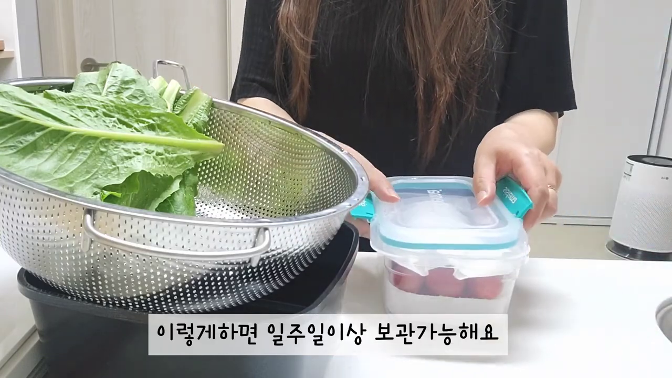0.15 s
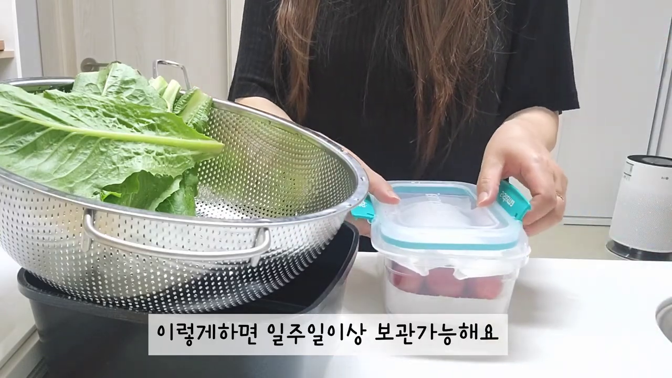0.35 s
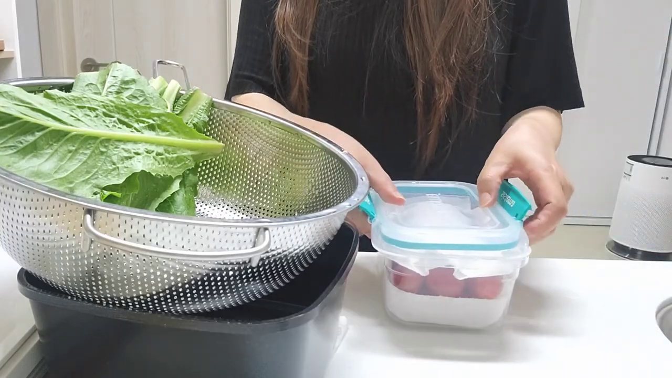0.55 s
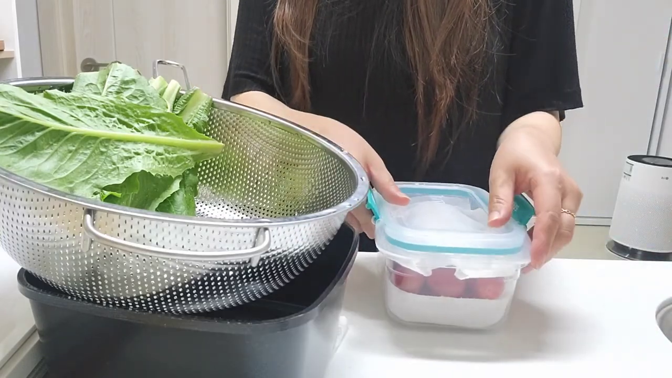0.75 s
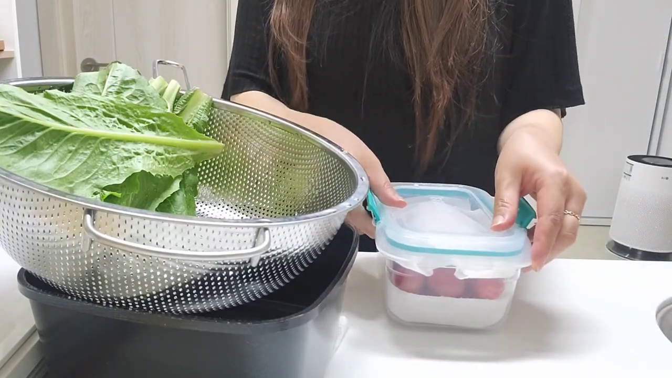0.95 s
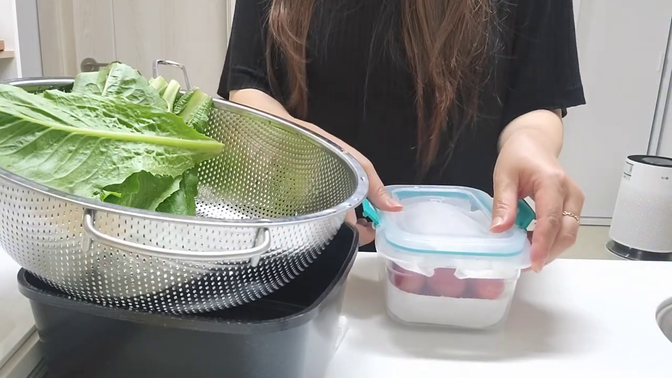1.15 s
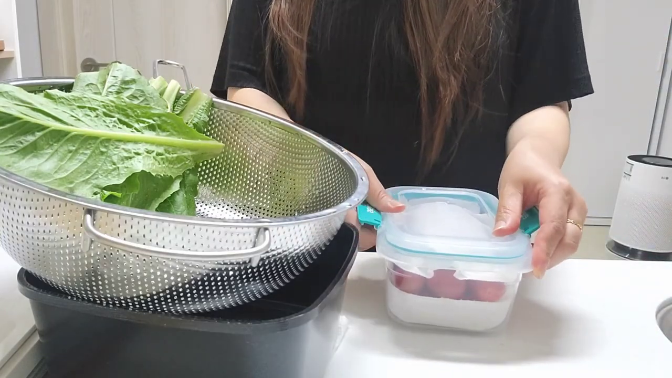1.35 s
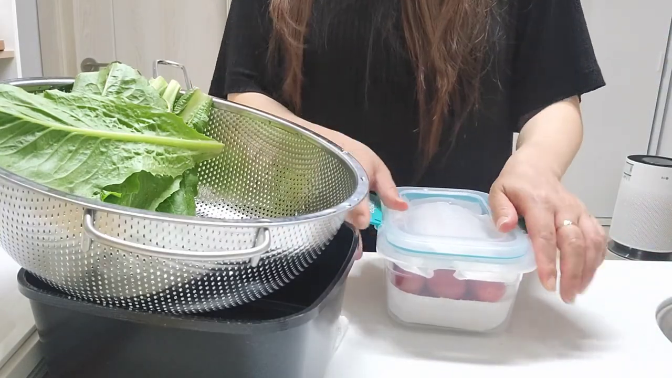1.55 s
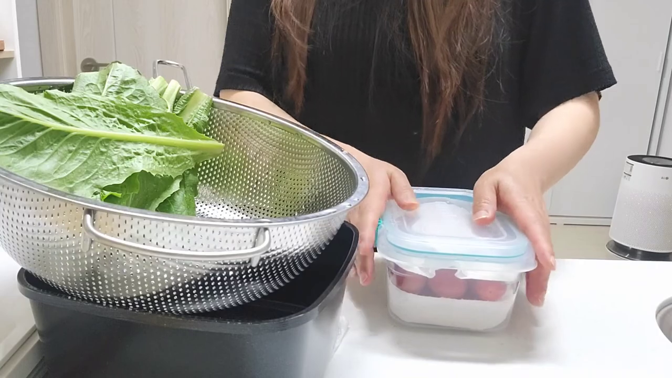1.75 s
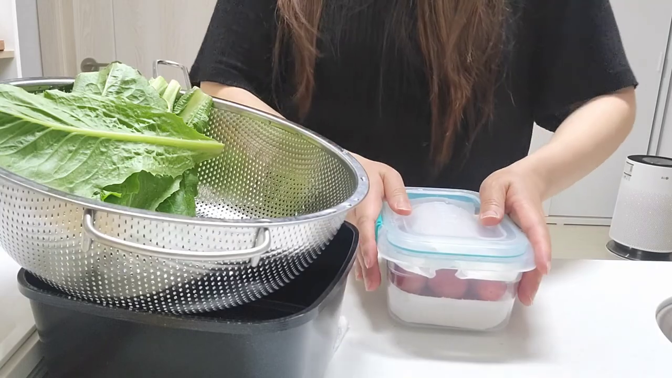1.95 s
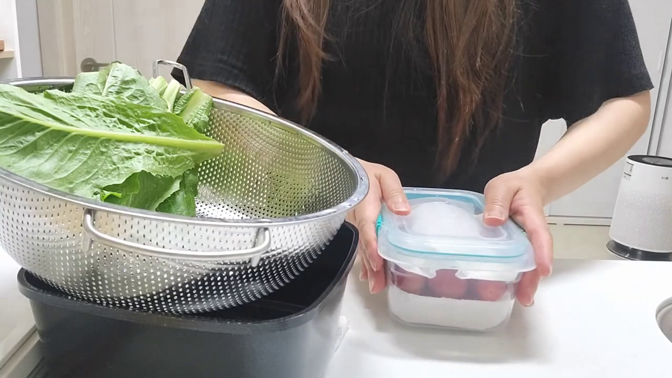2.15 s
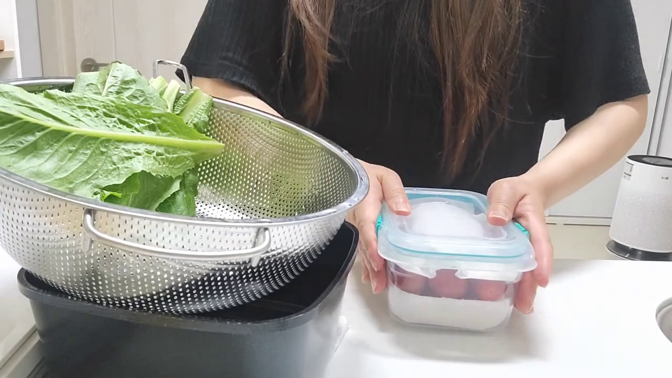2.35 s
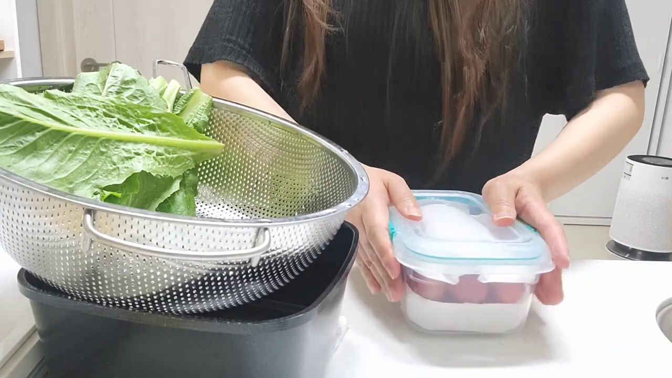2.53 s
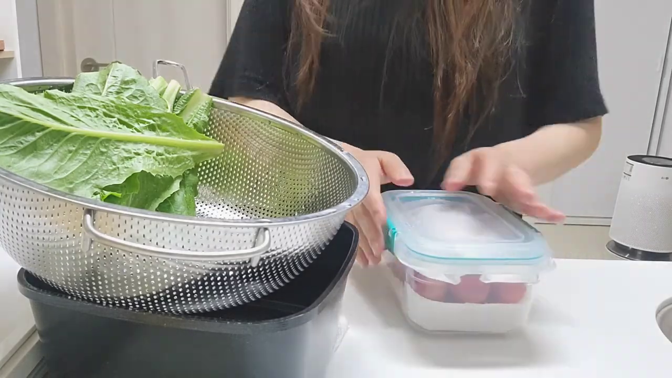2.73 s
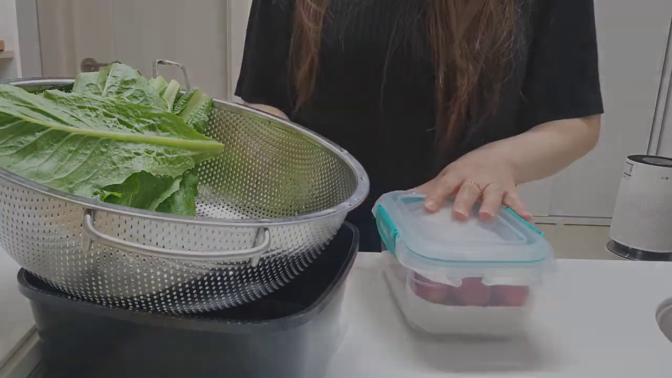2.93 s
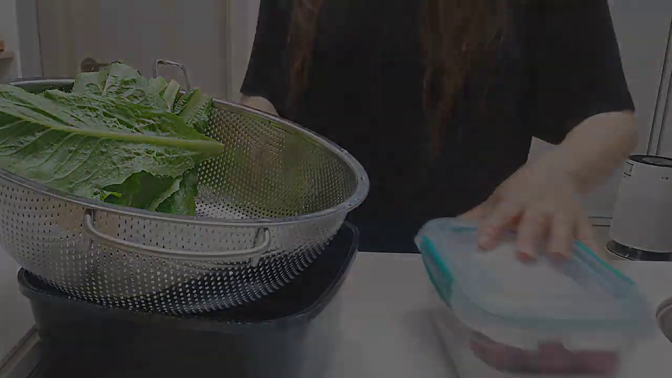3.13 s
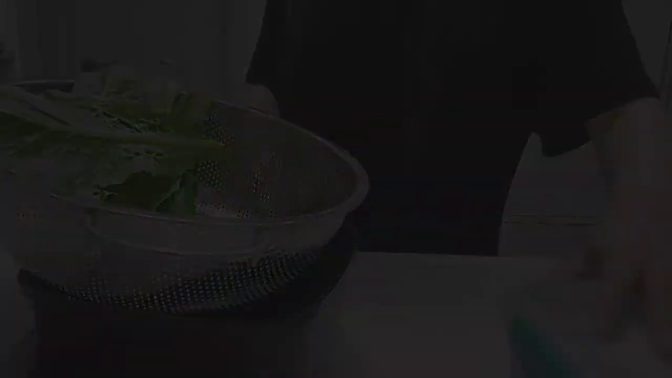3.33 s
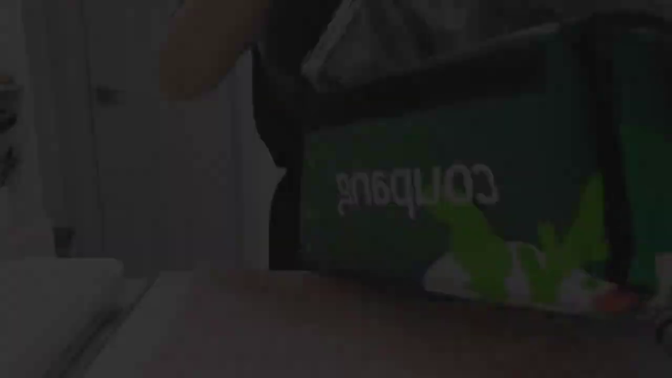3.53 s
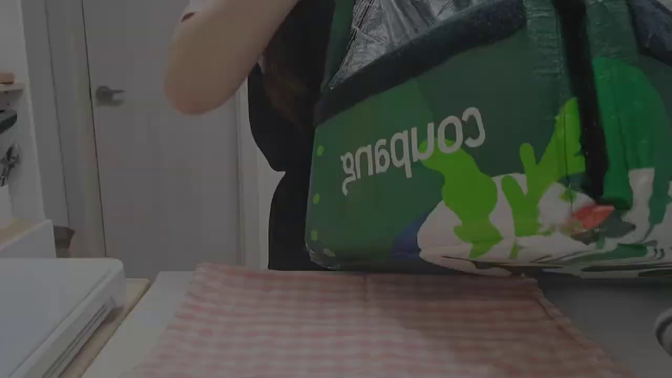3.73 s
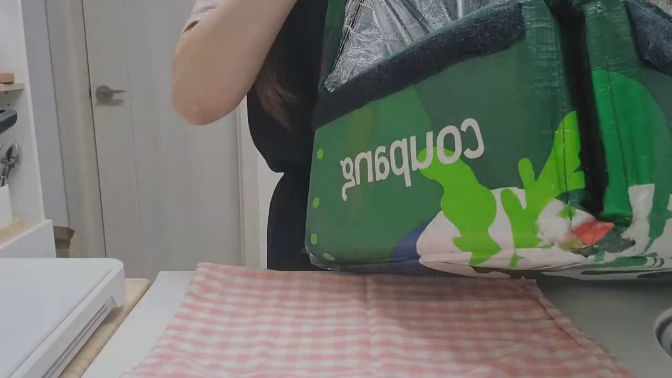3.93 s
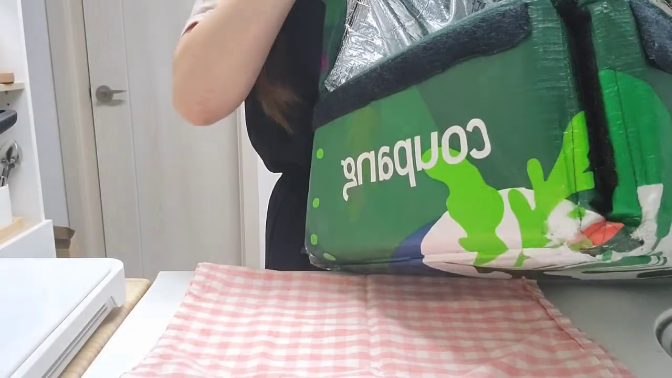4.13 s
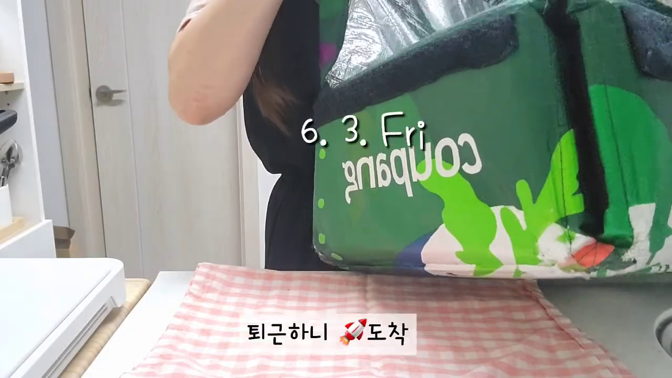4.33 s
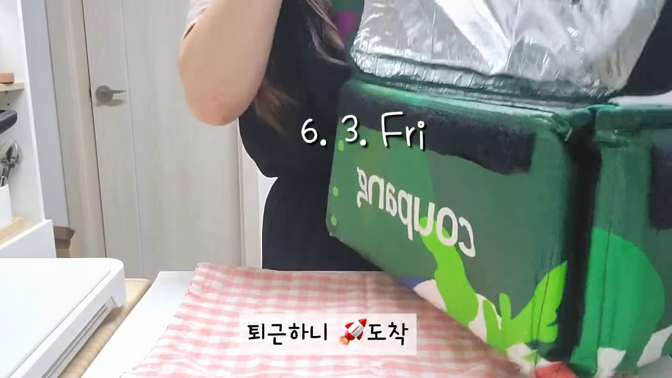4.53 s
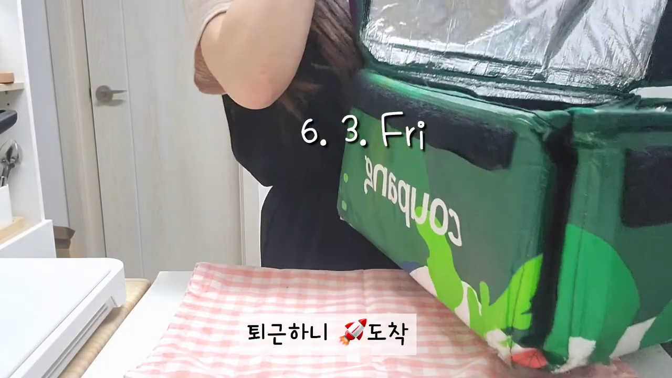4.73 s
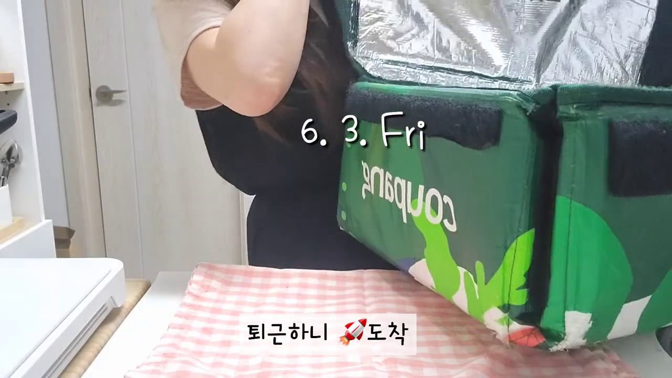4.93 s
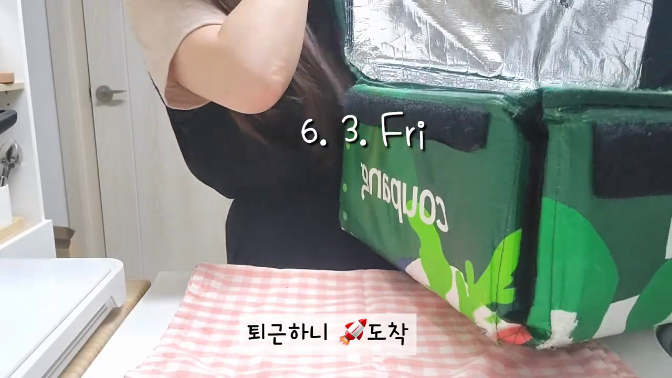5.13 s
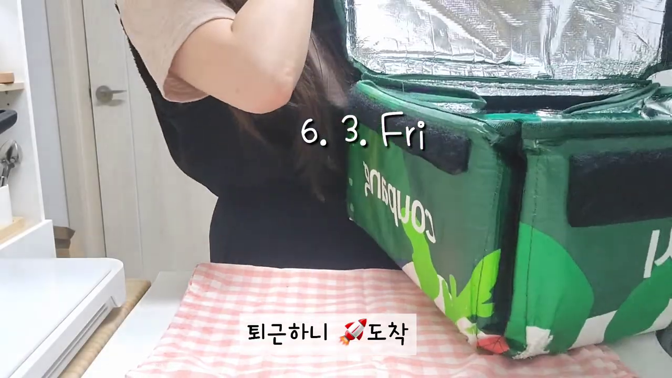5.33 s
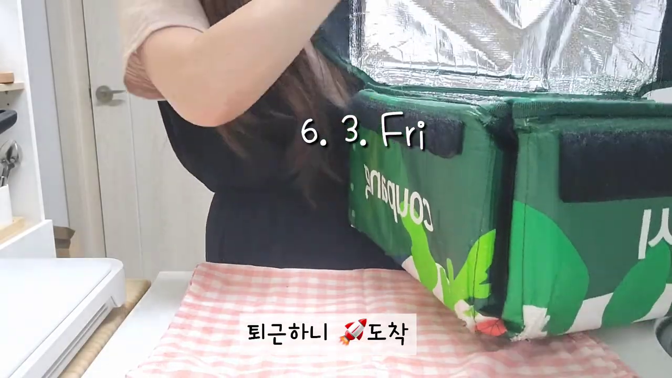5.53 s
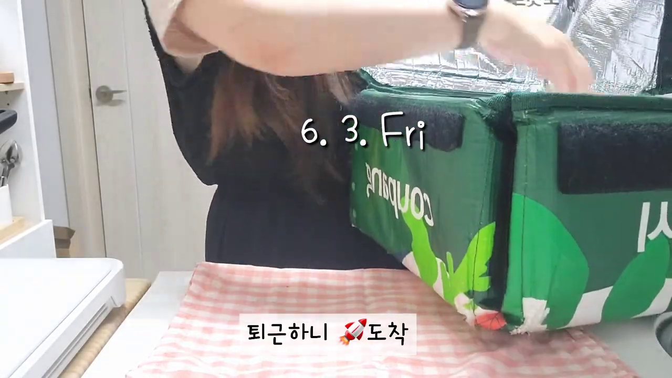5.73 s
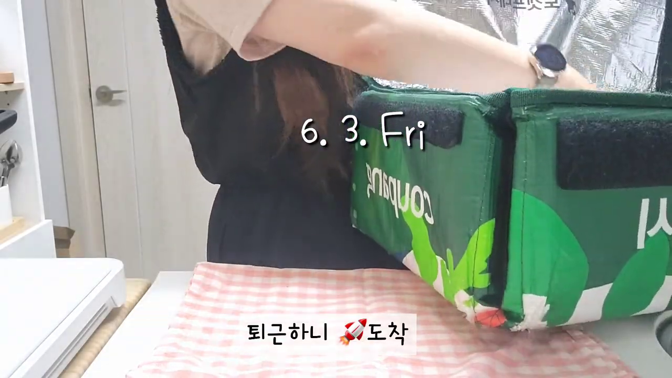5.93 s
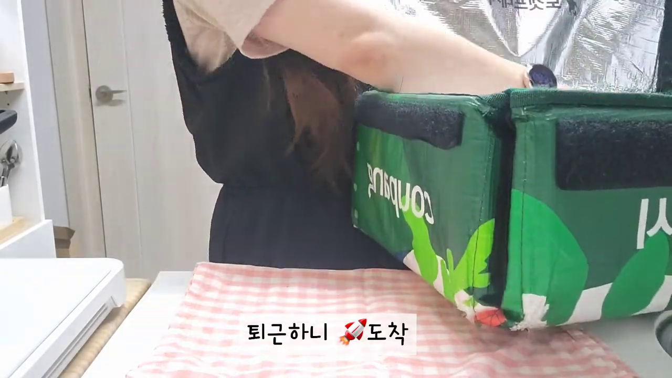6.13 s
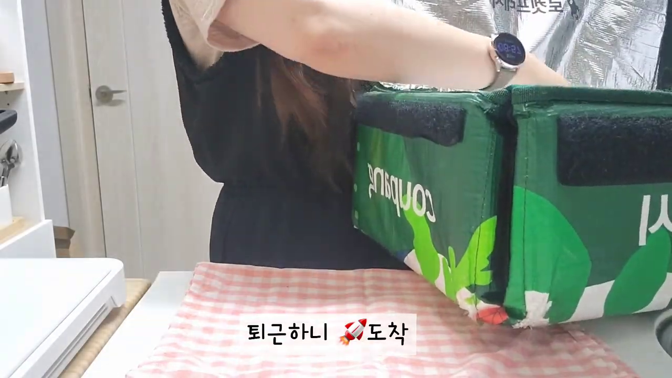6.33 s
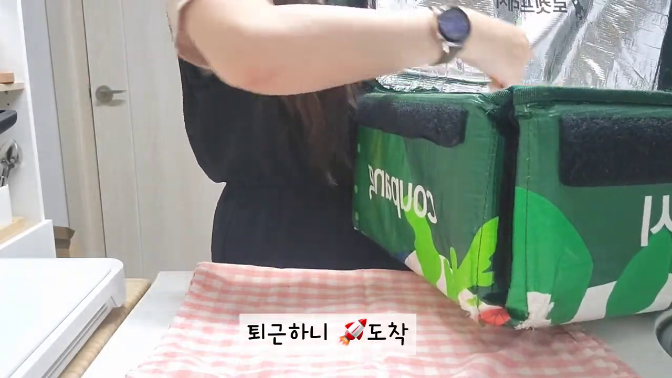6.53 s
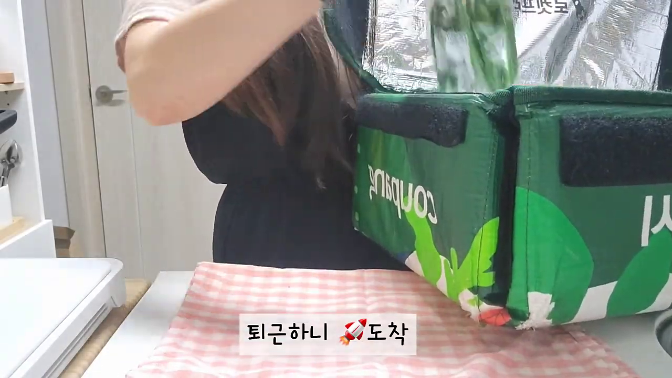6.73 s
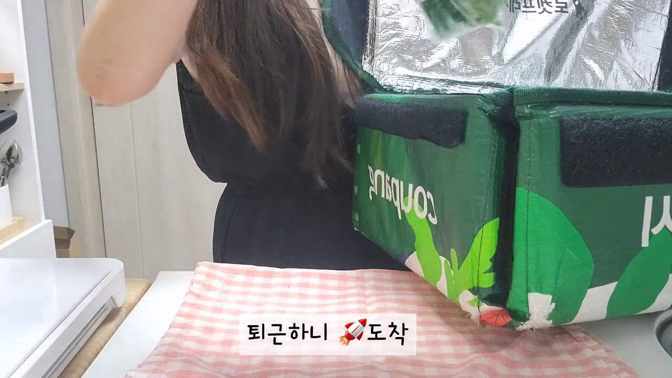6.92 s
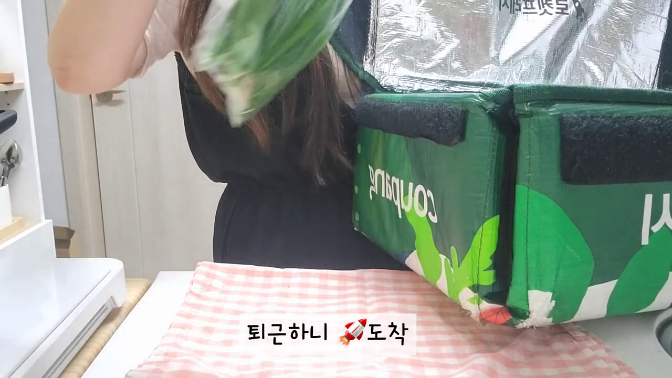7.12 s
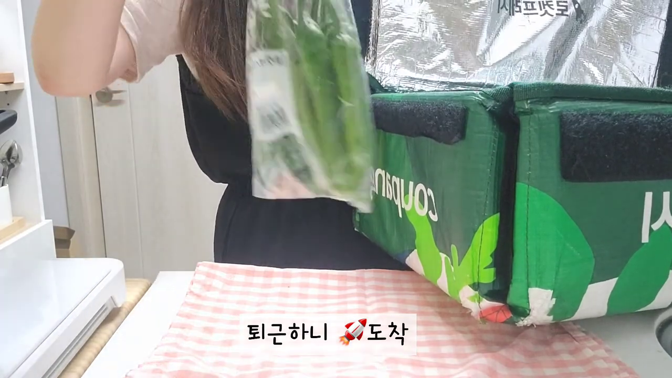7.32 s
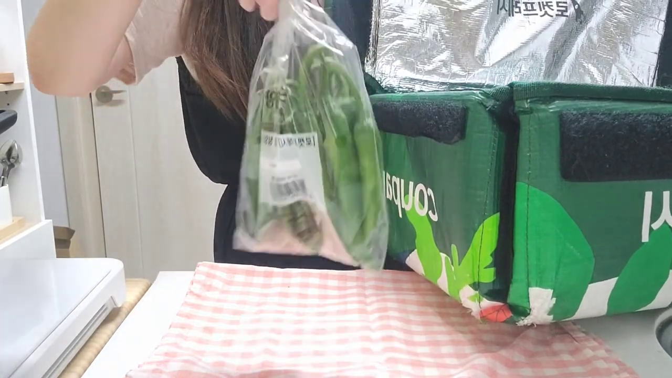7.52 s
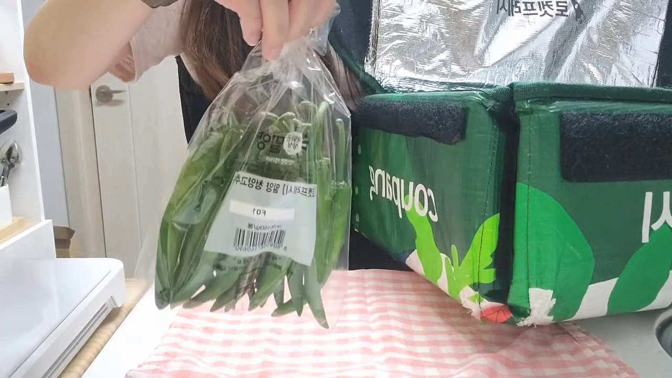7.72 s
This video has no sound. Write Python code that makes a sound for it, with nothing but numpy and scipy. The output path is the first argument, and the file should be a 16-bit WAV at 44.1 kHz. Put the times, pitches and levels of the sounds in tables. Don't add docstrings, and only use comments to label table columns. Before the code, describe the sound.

Plastic food box latches snap shut and the box slides off, then a padded foil-lined bag thumps down and thin film crinkles.

```python
import sys
import numpy as np
from scipy import signal
from scipy.fft import rfft, irfft, next_fast_len
from scipy.io import wavfile
from scipy.ndimage import uniform_filter1d

SR = 44100
rng = np.random.default_rng(int(sys.argv[2]) if len(sys.argv) > 2 else 0)


def dump(signal):
    limited = np.clip(np.atleast_2d(signal).T, -1, 1)
    pcm = np.round(limited * 32767).astype(np.int16)
    wavfile.write(sys.argv[1], SR, pcm)


def gain_from_db(level_db):
    decades = np.asarray(level_db, float) / 20
    return 10 ** decades


N = 347067
SCENE_CHANGE_S = 3.538
FILM_LEAVES_S = 6.88

# f/Hz, level/dB per Hz
AIR_BEFORE = [(44, -29.5), (75, 0), (96, -4.5), (184, -7), (462, -19), (528, -17), (707, -18.5),
              (1010, -33.5), (1390, -27.5), (2080, -36.5), (16000, -56.5)]
AIR_AFTER = [(12, -47), (20, -27), (117, -2.5), (174, -17.5), (237, 0.5), (479, -8.5), (709, 0.5),
             (994, -13), (1110, -9.5), (2970, -17.5), (9670, -44), (14300, -33.5), (16500, -32)]
# f/Hz, width/Hz, level/dB
FRIDGE_LINES = [(111.1, 3, -64.5), (225.7, 17, -69.5)]
# t/s, level/dB
FINGER_RUBS = [
    [(0.0, -71), (0.236, -69), (0.28, -55)],
    [(0.66, -78), (0.78, -74)],
    [(1.34, -69), (1.42, -65.5), (1.55, -90)],
    [(1.58, -74), (1.682, -67), (1.82, -62.5), (1.9, -80)],
]
# f/Hz, level/dB per Hz
SKIN_COLOUR = [(300, -36), (650, -14), (950, -15), (1300, -8.5), (2200, -25.5), (4200, -22), (14000, -40.5)]
# t/s, level/dB
BOX_NUDGES = [
    [(1.88, -72), (2.04, -59.5), (2.14, -63.5)],
    [(2.5, -75), (2.54, -58.5), (2.9, -83)],
]
# rim pitch/factor, plain scuff/dB re rims
NUDGE_GRIPS = [
    (1, -5),
    (1.075, 2.5),
]
# f/Hz, width/Hz, level/dB
RIM_MODES = [(1340, 150, -6), (2480, 180, -8), (3200, 230, -3), (3600, 260, 0), (4900, 400, -6),
             (6060, 200, -8)]
# t/s, hiss level/dB, scrape/dB re hiss
LONG_PUSH = [(2.98, -97.5, 21), (3.05, -52.5, -6), (3.12, -56.5, -2.5), (3.462, -43, -9.5), (3.538, -62, 4)]
# f/Hz, level/dB
PUSH_COLOUR = [(1500, -7), (3000, -2.5), (6000, 11), (9000, 8.5), (15100, 6), (16100, -9.5), (16500, -38)]
# t/s, level/dB
LID_GRIP = [(0, -58.5), (.1, -60.5), (.27, -58.5), (.29, -50)]
# f/Hz, width/Hz, level/dB
GRIP_MODES = [(656, 110, 3), (1380, 380, -3.5)]
# t/s, peak level/dB, hollow body/dB re peak, bright crack/dB re peak
BOX_TAPS = [(0.0713, -32.5, 1.5, -26), (0.221, -55, 1, -5), (0.272, -42.5, 10, -17), (2.151, -42, 4, -20.5),
            (0.78, -55.5, 16, -21), (0.824, -43.5, 1, -14), (0.835, -50, 15.5, -32), (1.146, -52, -2, -19),
            (1.132, -51, 6.5, -12), (1.31, -61, 8, -17), (1.38, -55, 2, -16), (1.65, -38.5, -0.5, -22),
            (1.722, -36, -8, -17), (1.75, -46, 1, -14), (1.777, -50, 10.5, -3), (1.785, -32, -14, -15),
            (1.843, -39.5, -7, -24), (1.857, -37, -3, -31), (2.761, -54, 1, -11), (2.898, -57, 0.5, -15),
            (2.918, -48.5, -2.5, -14), (3.104, -40.5, 3, -6), (3.292, -30, -11, -9),
            (3.329, -22.5, -10.5, -9), (3.343, -35, -6, -25), (3.409, -41, -4, -20), (0.585, -62.5, 8, -22)]
# f/Hz, width/Hz, level/dB
BOX_MODES = [(328, 11.6, 4), (700, 59, 5), (1270, 11, 11), (1450, 22, 7), (1900, 34, -7.5), (2570, 33, -18),
             (2950, 72, -5), (4130, 100, -11.5)]
# t/s, length/s, f/Hz, level/dB
SQUEAK_EVENTS = [(3.415, 0.085, 5300, -51), (2.71, 0.09, 3640, -74), (3.685, 0.027, 5810, -56),
                 (5.16, 0.05, 4240, -63), (5.87, 0.05, 4120, -68), (3.015, .09, 3980, -62),
                 (3.045, .09, 3280, -62), (3.14, .05, 8300, -64), (3.225, .07, 3400, -60),
                 (3.26, .045, 8800, -57), (3.26, .05, 2000, -59), (3.3, .06, 5400, -57),
                 (3.37, .03, 4500, -55), (3.44, .06, 7900, -59), (1.915, .04, 3620, -70),
                 (1.925, .03, 6050, -72), (.1, .08, 4300, -80), (1.61, .04, 3500, -74)]
# t/s, peak level/dB, hollow body/dB re peak, bright crack/dB re peak
LATCH_SNAPS = [
    (0.283, -13, -3.5, -18),
    (2.1595, -11.5, 1.5, -23.5),
    (2.198, -2.5, -16.5, -17),
    (2.303, -15.5, 4.5, -32),
    (2.3099, 1.5, -12, -13),
]
# f/Hz, width/Hz, level/dB
SHUT_BOX_MODES = [(300, 74, -2), (514.4, 26, -23.5), (713, 40, 5), (1160, 26, 0), (1380, 76, 8.5),
                  (1600, 80, 3), (2000, 53, -6), (2520, 80, -12), (3000, 150, -0.5), (3820, 100, -13),
                  (4300, 260, -21)]
# t/s, peak level/dB, f/Hz
COUNTER_BUMPS = [(0.3, -35.5, 168), (2.156, -24.5, 296), (2.913, -42, 177), (3.83, -43.5, 59),
                 (4.06, -35, 81), (4.256, -34, 300), (4.379, -31, 156), (4.455, -25, 198),
                 (4.487, -30, 190), (4.529, -27, 260), (4.573, -25.5, 300), (4.616, -25.5, 114),
                 (5.601, -46.5, 240), (6.695, -39, 210), (7.077, -55, 306)]
# start t/s, hold/s, cloth level/dB, foil/dB re cloth, wall flex/dB re cloth
BAG_MOVES = [(3.538, 0.043, -40, 2, 3), (3.61, 0.077, -44.5, 3, 5.5), (3.7, 0.27, -63, -1, 11.5),
             (3.8, 0.048, -46, -1.5, -4), (4.05, 0.022, -46, -3, 3), (4.144, 0.0041, -45, 4, 0),
             (4.24, 0.17, -39, 5, -3.5), (4.44, 0.13, -33, 3.5, -1.5), (4.6, 0.091, -36, -6, -3),
             (4.675, 0.0083, -46, -14, -12), (4.8, 0.042, -47.5, -1, 0), (4.88, 0.6, -53, -3, -3),
             (5.458, 0.14, -55.5, 7.5, -30), (5.65, 0.082, -54.5, -6, -30), (5.83, 0.091, -60.5, 3, -30)]
# f/Hz, level/dB per Hz
CLOTH_COLOUR = [(210, 12.5), (350, -3), (885, -19.5), (1210, 2.5), (1340, -4.5), (2570, -9), (7000, -27),
                (9100, -57), (15400, -120)]
# f/Hz, level/dB per Hz
FOIL_COLOUR = [(2060, 11), (3500, 5.5), (15000, -13), (16200, -16), (16500, -59.5)]
# f/Hz, level/dB per Hz
WALL_COLOUR = [(24, -36), (40, 6.5), (112, -0.5), (248, -10.5), (600, -7), (780, -8), (1320, -120)]
# t/s, peak level/dB, centre f/Hz, bright crack/dB re peak
BAG_FOLDS = [(3.5386, -35, 1220, -7), (3.5671, -30.5, 1580, -16.5), (3.544, -44, 1300, -25),
             (3.579, -43, 2700, -25), (3.589, -35, 3000, -25), (3.6, -39, 1380, -34),
             (3.611, -30, 1230, -30), (3.619, -29, 1160, -14), (3.641, -40, 3000, -25),
             (3.654, -33, 3200, -25), (3.672, -28, 1600, -25), (3.684, -42, 3200, -25),
             (3.719, -43, 790, -28), (3.73, -49, 1310, -28), (3.749, -44, 1240, -28),
             (3.792, -50, 690, -30), (3.837, -32, 3330, -25), (3.6595, -21.5, 1600, -30),
             (3.736, -32.5, 1250, -11), (3.766, -31, 5700, -16), (3.8067, -32.5, 3230, -20.5),
             (3.823, -30, 1670, -17), (3.9319, -34, 1380, -38), (4.051, -38.5, 1450, -31),
             (4.0605, -38.5, 940, -27), (4.1185, -35, 1040, -17), (4.1434, -29.5, 1720, -2.5),
             (4.1848, -35.5, 1220, -34), (4.239, -31, 1730, -31), (4.4048, -23, 2650, -25),
             (4.4384, -35, 1450, -14), (4.5243, -31, 1090, -25), (4.255, -24, 1900, -29),
             (4.665, -27, 2200, -28), (4.697, -18.5, 3000, -32), (4.683, -19, 1800, -22),
             (4.687, -22.5, 2950, -31)]
# t/s, peak level/dB, centre f/Hz
SETTLING_FOLDS = [(4.804, -36.5, 1240), (4.8143, -36.5, 1240), (4.826, -32.5, 1600), (4.74, -55, 1700),
                  (4.995, -40, 1520), (5.052, -38, 690), (5.331, -55, 1500), (4.86, -44, 2900),
                  (4.877, -40.5, 2040), (4.929, -43, 1760), (4.9474, -32, 1260), (4.986, -36, 1600),
                  (5.042, -28.5, 1650), (5.0955, -42, 1160), (5.1152, -39, 1770), (5.224, -41.5, 1380),
                  (5.4605, -34.5, 1510), (5.615, -39, 2000), (5.632, -44, 1900), (5.684, -48, 3500),
                  (5.5834, -43, 1810)]
# start t/s, hold/s, crinkle level/dB, lower body/dB re crinkle
FILM_PULLS = [(6.114, 0.0046, -47, 9), (6.158, 0.052, -45, 3.5), (6.235, 0.078, -43, 1.5),
              (6.345, 0.061, -43, 4.5), (6.465, 0.041, -42.5, 0), (6.55, 0.12, -46, 2),
              (6.64, 0.076, -40.5, 0), (6.72, 0.087, -46.5, -1.5), (6.852, 0.071, -41, -2),
              (6.945, 0.062, -43.5, -1), (7.048, 0.035, -35.5, 0), (7.074, 0.012, -42, -2),
              (7.162, 0.027, -35.5, -3), (7.2, 0.2, -44, -3.5), (7.411, 0.011, -45, -0.5),
              (7.466, 0.036, -46.5, 4.5), (7.545, 0.038, -45, 0.5), (7.7, 0.028, -48, 1.5),
              (7.82, 0.041, -55.5, -1)]
# f/Hz, level/dB per Hz
FILM_COLOUR = [(1800, -42), (3500, 0), (9000, -11), (15100, -11), (16200, -11)]
# f/Hz, level/dB per Hz
BUNDLE_COLOUR = [(200, 6.5), (400, -5), (1000, -11.5), (1800, -5.5), (2400, -11), (3100, -3.5), (4000, -22),
                 (6000, -14), (9000, -9)]
# f/Hz, width/Hz, level/dB
POCKET_MODES = [(1800, 300, 0), (3080, 340, -2), (3900, 300, -2)]
# t/s, peak level/dB, centre f/Hz, contact/ms
FILM_CREASES = [(6.1154, -38, 3340, 7.2), (6.201, -41, 1470, 5.6), (6.248, -37, 3000, 5.3),
                (6.282, -34, 1980, 6), (6.3473, -42, 1740, 4.3), (6.385, -30, 3300, 8.8),
                (6.404, -44, 3800, 4.3), (6.4475, -35, 3070, 4.5), (6.4655, -36.5, 1660, 7.4),
                (6.488, -36, 4000, 4), (6.5455, -37, 2070, 7), (6.582, -37.5, 1800, 3.8),
                (6.607, -40, 1770, 5.5), (6.662, -30, 3000, 10), (6.265, -30, 2910, 8.4),
                (6.361, -33.5, 1840, 4.1), (6.654, -28, 3000, 4), (6.6918, -26.5, 1900, 27),
                (6.7069, -22, 3130, 9.7), (6.8312, -40.5, 1690, 4), (6.853, -39, 1680, 6),
                (6.8726, -31, 3000, 4.7), (6.926, -35.5, 1450, 4.3), (6.954, -36, 1800, 4.5),
                (6.9056, -27, 2800, 3.1), (6.99, -32.5, 1880, 3.6), (7.0542, -37, 1620, 3.2),
                (7.0678, -27, 2900, 3.3), (7.096, -29, 4200, 4), (7.0756, -20.5, 4320, 6),
                (7.086, -23, 4400, 6), (7.16, -29, 1570, 15), (7.18, -28, 2800, 7.5), (7.278, -37, 5650, 8),
                (7.3417, -27, 4300, 5.4), (7.222, -35, 2510, 4), (7.371, -34, 1600, 2.6),
                (7.4123, -39, 1830, 4), (7.4518, -33, 2000, 3.6), (7.5376, -42, 3300, 4),
                (7.5774, -35.5, 1230, 3.5), (7.6045, -29.5, 3020, 5.7), (7.6954, -31, 3870, 4.5),
                (7.669, -36, 8000, 5.5), (7.7115, -34, 3820, 7.5), (7.772, -29, 5500, 6.1)]
# t/s, peak level/dB
FILM_TICKS = [(7.242, -37), (7.2783, -29.5), (7.343, -26), (7.363, -27), (7.413, -30), (7.4666, -30.5),
              (7.529, -34), (7.621, -33.5), (7.67, -27), (7.7154, -29), (7.774, -29.5), (7.8354, -39)]
# f/Hz, t60/s
ROOM_DECAY = [(100, 0.053), (400, 0.36), (1500, 0.28), (4000, 0.18), (12000, 0.19)]
# f/Hz, likeness/0..1
PORT_LIKENESS = [(60, .97), (150, .97), (300, .86), (600, .66), (1300, .35), (2400, .12), (5000, 0)]
# f/Hz, level/dB
TREBLE_END = [(15600, 0.5), (16200, -12.5), (16900, -40.5)]


def evened(x):
    return x / np.sqrt(np.mean(x ** 2) + 1e-20)


def peaked(x, db):
    return gain_from_db(db) * x / abs(x).max(1, keepdims=True)


def read(points, hz):
    f, value = np.transpose(points)
    return np.interp(np.log(hz + 1), np.log(f + 1), value)


def curves(rows):
    s, level, *rest = np.transpose(rows)
    t = np.arange(N) / SR
    return [np.interp(t, s, level, -200, -200)] + [np.interp(t, s, c) for c in rest]


def add(mix, s, sound):
    part = mix[:, round(s * SR):][:, :sound.shape[1]]
    part += sound[:, :part.shape[1]]


def coloured(x, points):
    size = next_fast_len(N)
    gain = gain_from_db(read(points, np.fft.rfftfreq(size, 1 / SR)))
    return evened(irfft(rfft(x, size) * gain, size)[:, :N])


def band(x, low_hz, high_hz):
    return signal.sosfilt(signal.butter(2, [low_hz, high_hz], "band", fs=SR, output="sos"), x)


def resonate(x, hz, width):
    return signal.lfilter(*signal.iirpeak(np.clip(hz, 20, 20000), max(hz / width, .3), SR), x)


def resonate_twice(x, hz, width, second_width):
    return resonate(resonate(x, hz, width), hz, second_width)


def drift(per_s):
    knots_per_s = 400
    knots = rng.standard_normal(int(N / SR * knots_per_s) + 2)
    knots = uniform_filter1d(knots, max(round(knots_per_s / per_s), 1))
    return np.interp(np.arange(N) * knots_per_s / SR, np.arange(len(knots)), evened(knots))


def grains(low_hz, high_hz, per_s, spread_db, cycles, hiss, clump_db):
    bed = np.zeros((2, N))
    for hz in np.geomspace(low_hz, high_hz, num=9):
        size = gain_from_db(spread_db * np.minimum(rng.exponential(1, N), 3))
        size *= rng.random(N) < per_s / 9 / SR
        size *= gain_from_db(clump_db * drift(70))
        puff = rng.choice([-1., 1.], (2, N)) * signal.lfilter([1], [1, -.95], size)
        bed += evened(resonate(puff, hz, hz / cycles)) * np.sqrt(hz)
    bed = evened(bed) + hiss * rng.standard_normal((2, N))
    return bed * gain_from_db(clump_db * drift(45))


def moves(rows, attack_s, sag_db_s, release_db_s):
    t, power = np.arange(N) / SR, 0
    for s, hold, db, *rel_db in rows:
        u = t - s
        fall_db = sag_db_s * np.clip(u, 0, hold) + release_db_s * np.maximum(u - hold, 0)
        shape = np.clip(u / attack_s, 0, 1) * gain_from_db(db - fall_db)
        power = power + (gain_from_db([0, *rel_db])[:, None] * shape) ** 2
    return np.sqrt(power)


def contact(ms, chance, rise_ms=0.78):
    t = np.arange(chance.shape[1]) / SR * 1000
    first = 1 + 1.5 * np.exp(-t / 1.2)
    return chance * first * np.exp(-t / max(ms, .2)) * np.minimum(t / rise_ms, 1)


def struck(blow, at_ms, db):
    at, spike = round(at_ms * SR / 1000), np.zeros_like(blow)
    spike[0, at:at + 4] = spike[1, at + 3:at + 7] = [.35, 1, .65, .15]
    return blow - gain_from_db(db) * abs(blow).max() * spike


def crack(x, edge_hz):
    return band(x, edge_hz, 15700)


def room_tone():
    t = np.arange(N) / SR
    noise = rng.standard_normal((2, N))
    drone = evened(resonate_twice(noise, 49, 4, 12))
    beat_db = 3 * np.cos(2 * np.pi * (t - .69) / 0.65)
    drone = drone * gain_from_db(-52.5 + beat_db)
    motor = sum(gain_from_db(db) * evened(resonate_twice(noise, hz, w, w)) for hz, w, db in FRIDGE_LINES)
    air = rng.standard_normal((2, N)) * gain_from_db(1.0 * drift(20.0))
    before = gain_from_db(-61.5) * coloured(air, AIR_BEFORE) + drone
    after = gain_from_db(-52.5) * coloured(air, AIR_AFTER) + motor
    return np.where(t >= SCENE_CHANGE_S, after, before)


def box_slides():
    rub = grains(950, 12000, 7000, spread_db=1.9, cycles=0.83, hiss=0.2, clump_db=0.63)
    out = coloured(rub, SKIN_COLOUR) * sum(gain_from_db(curves(rows)[0]) for rows in FINGER_RUBS)
    for rows, (pitch, scuff_db) in zip(BOX_NUDGES, NUDGE_GRIPS):
        rims = 0
        for hz, w, db in RIM_MODES:
            rims = rims + gain_from_db(db + 2 * drift(20)) * evened(resonate_twice(rub, pitch * hz, w, 2 * w))
        scuff = gain_from_db(scuff_db) * evened(band(rub, 900, 5300))
        out += evened(evened(rims) + scuff) * gain_from_db(curves(rows)[0])
    hiss_db, scrape_db = curves(LONG_PUSH)
    scrape = gain_from_db(scrape_db) * evened(band(rub, 235, 5300))
    return out + gain_from_db(hiss_db) * (coloured(rub, PUSH_COLOUR) + scrape)


def lid_grip():
    noise = rng.standard_normal((2, N)) * gain_from_db(2.5 * drift(50))
    creak = sum(gain_from_db(db) * resonate_twice(noise, hz, w, w) for hz, w, db in GRIP_MODES)
    return gain_from_db(curves(LID_GRIP)[0]) * evened(creak)


def knock_box(rows, modes, ms, ms_per_hollow_db, thump_db, thump_slope):
    out = np.zeros((2, N))
    for s, db, body_db, crack_db in rows:
        contact_ms = ms + ms_per_hollow_db * body_db
        blow = contact(contact_ms, rng.standard_normal((2, 4000)) ** 3, 0.19 * contact_ms)
        blow = struck(blow, at_ms=1.0, db=3)
        grip = rng.uniform(0.95, 1.05, len(modes))
        rings = sum(gain_from_db(.5 * g) * resonate(blow, hz * k, w + .12 * hz) for (hz, w, g), k in zip(modes, grip))
        shell = rings + .45 * resonate(blow, 900, 2200)
        body = band(shell, 160, 718)
        lid_top_hz = np.clip(3000 * gain_from_db(-body_db), 1500, 9000)
        lid = band(shell, 530, lid_top_hz)
        thump = resonate_twice(blow, 150, 160, 160)
        bright = band(contact(1.5, blow), 2400, 12000)
        sound = peaked(body, db + body_db) + peaked(lid, db)
        sound += peaked(thump, db + thump_db + thump_slope * body_db)
        add(out, s, sound + peaked(bright, db + crack_db + 11.0))
    return out


def box_taps():
    return knock_box(BOX_TAPS, BOX_MODES, ms=11.2, ms_per_hollow_db=0.39, thump_db=-5.5, thump_slope=0.98)


def squeaks():
    out = np.zeros((2, N))
    for s, length, hz, db in SQUEAK_EVENTS:
        noise = rng.standard_normal((2, 6000))[:, :round(length * SR)]
        tone = evened(resonate_twice(noise, hz, 140, 140))
        add(out, s, gain_from_db(db) * tone * signal.windows.tukey(tone.shape[1], .5))
    return out


def latches():
    return knock_box(LATCH_SNAPS, SHUT_BOX_MODES, ms=6.33, ms_per_hollow_db=-0.37, thump_db=-15, thump_slope=1.3)


def bumps():
    out = np.zeros((2, N))
    for s, db, hz in COUNTER_BUMPS:
        push = contact(33.0, rng.standard_normal((2, 5000)), 3.3)
        add(out, s, peaked(resonate_twice(push, hz, 0.43 * hz, 0.43 * hz), db))
    return out


def padded_bag():
    scrape, rustle, flex = moves(BAG_MOVES, attack_s=.004, sag_db_s=0.0, release_db_s=245)
    cloth = grains(430, 6700, 3000, spread_db=2.3, cycles=3.5, hiss=0.75, clump_db=1.7)
    foil = grains(2870, 26000, 2800, spread_db=1.3, cycles=6.3, hiss=0.59, clump_db=1.87)
    wall = grains(67, 625, 500, spread_db=1.7, cycles=2.7, hiss=0.42, clump_db=2.3)
    out = scrape * coloured(cloth, CLOTH_COLOUR) + rustle * coloured(foil, FOIL_COLOUR)
    return out + flex * coloured(wall, WALL_COLOUR)


def snaps(table, sharpness, edge_hz):
    out = np.zeros((2, N))
    for s, db, hz, crack_db, ms in table:
        blow = contact(ms, rng.standard_normal((2, 2500)) ** 3, 0.21 * ms)
        blow = struck(blow, at_ms=.5, db=-2)
        width = hz / sharpness
        fold = resonate(blow, hz, width) + gain_from_db(-7) * resonate(blow, 1.95 * hz, width) + 0.51 * blow
        fold = band(fold, 0.52 * hz, 2.1 * min(hz, 6000))
        fold = band(fold, 0.54 * hz, 1.63 * min(hz, 5000))
        add(out, s, peaked(fold, db + 0.5) + peaked(crack(blow, edge_hz), db + crack_db))
    return out


def folds():
    moving = [(*row, 8.1) for row in BAG_FOLDS]
    settling = [(*row, -37, 6) for row in SETTLING_FOLDS]  # crack/dB, contact/ms
    return snaps(moving + settling, sharpness=5.0, edge_hz=7000)


def film_bag():
    pull, squeeze = moves(FILM_PULLS, attack_s=.009, sag_db_s=3.0, release_db_s=360)
    crinkle = grains(3000, 13000, 2600, spread_db=2.6, cycles=3.0, hiss=0.2, clump_db=2.8)
    crinkle = coloured(crinkle, FILM_COLOUR)
    bundle = grains(409, 5940, 1800, spread_db=2.8, cycles=3.8, hiss=.3, clump_db=2.2)
    bundle = coloured(bundle, BUNDLE_COLOUR)
    rung = 0
    for hz, w, db in POCKET_MODES:
        rung = rung + gain_from_db(db + 7 * drift(30)) * resonate_twice(bundle, hz, w, 2 * w)
    inside = np.clip((FILM_LEAVES_S - np.arange(N) / SR) / 0.12, 0, 1)
    return pull * crinkle + squeeze * (bundle + gain_from_db(-16) * inside * evened(rung))


def creases():
    start = FILM_CREASES[0][0]
    rows = [(s, db, hz, -5 + 1.5 * (s - start), ms) for s, db, hz, ms in FILM_CREASES]
    return snaps(rows, sharpness=16.0, edge_hz=6500)


def film_ticks():
    out = np.zeros((2, N))
    for s, db in FILM_TICKS:
        tick = contact(5.6, rng.standard_normal((2, 800)) ** 3)
        add(out, s, peaked(crack(tick, 4400), db + 4.5))
    return out


def kitchen(x):
    out = np.zeros((2, N))
    for k in range(3):
        taps = np.zeros((2, SR // 2))
        at = np.arange(100, SR // 2 - 20, 20) + rng.integers(0, 20, (2, (SR // 2 - 101) // 20))
        np.put_along_axis(taps, at, rng.choice([-1., 1.], at.shape), 1)
        hz, t, z = signal.stft(taps, SR, nperseg=256)
        decay = gain_from_db(-60 * t / read(ROOM_DECAY, hz)[:, None])
        tail = signal.istft(z * decay, SR, nperseg=256)[1]
        turn = np.sqrt(2 / 3) * np.cos(2 * np.pi * (4 * np.arange(N) / SR + k / 3))
        out += signal.oaconvolve(x * turn, tail / np.linalg.norm(tail[0]), axes=1)[:, :N]
    return out


def scene():
    knocks = box_taps() + latches() + folds() + bumps()
    rubs = box_slides() + lid_grip() + squeaks() + padded_bag()
    left = gain_from_db([[.8], [-.8]])
    knocks = knocks + left * (creases() + film_ticks())
    rubs = rubs + left * film_bag()
    echoes = kitchen(gain_from_db(-7.5) * knocks + gain_from_db(-6.5) * rubs)
    return knocks + gain_from_db(-5.5) * rubs + echoes + room_tone()


def low_pass(x):
    return signal.sosfilt(signal.butter(12, 16990, fs=SR, output="sos"), x)


def record(dry):
    size = next_fast_len(N)
    hz = np.fft.rfftfreq(size, 1 / SR)
    a, b = rfft(dry, size) * gain_from_db(read(TREBLE_END, hz))
    angle = np.arccos(np.clip(read(PORT_LIKENESS, hz), -1, 1)) / 2
    turn = np.pi / 4 - angle
    ports = np.array([np.cos(turn) * a + np.sin(turn) * b, np.sin(turn) * a + np.cos(turn) * b])
    mix = irfft(ports, size)[:, :N] * gain_from_db([[-.45], [.45]])
    return low_pass(mix)


dry = scene()
out = record(dry)
dump(out)
```